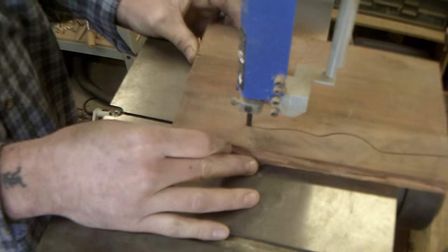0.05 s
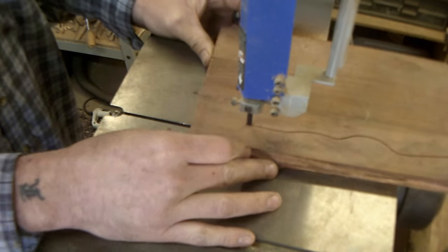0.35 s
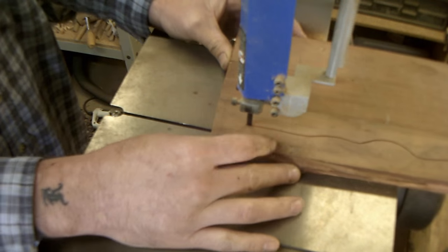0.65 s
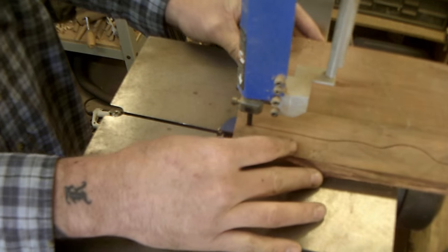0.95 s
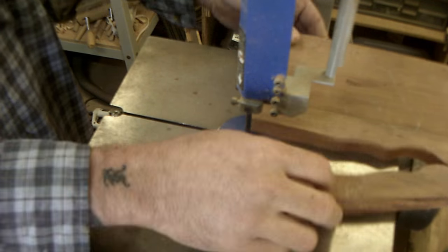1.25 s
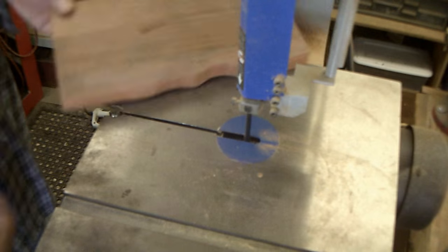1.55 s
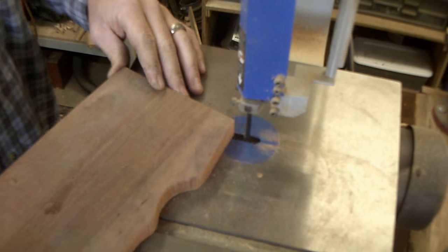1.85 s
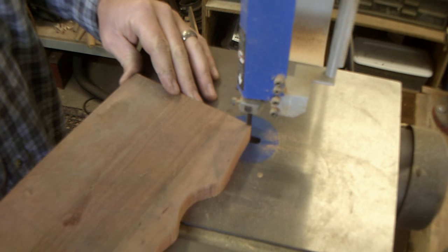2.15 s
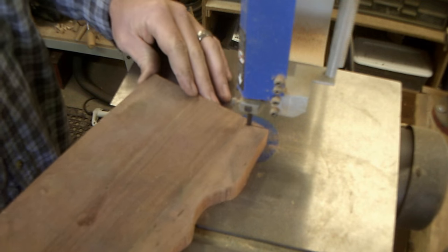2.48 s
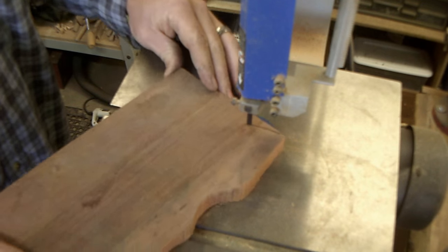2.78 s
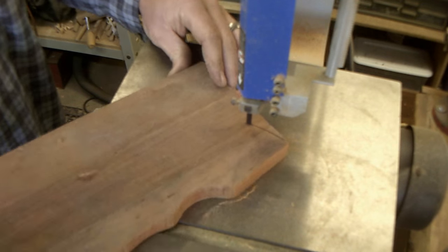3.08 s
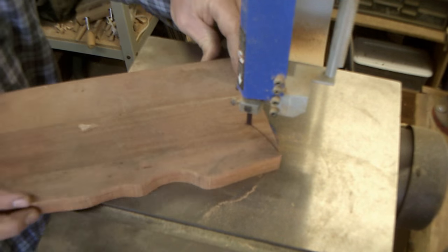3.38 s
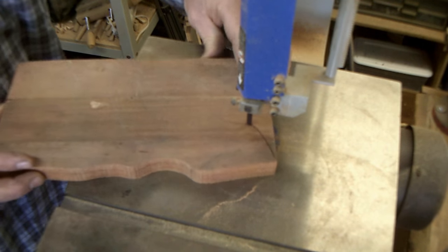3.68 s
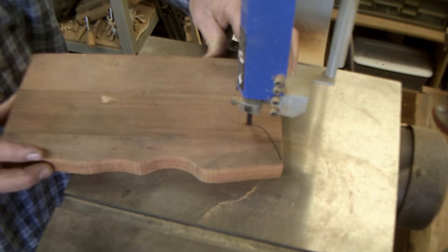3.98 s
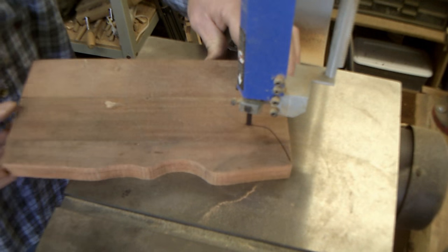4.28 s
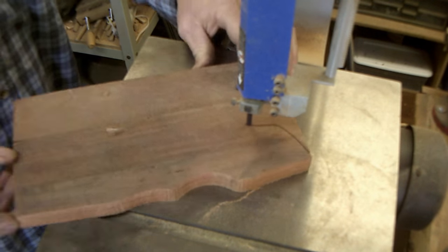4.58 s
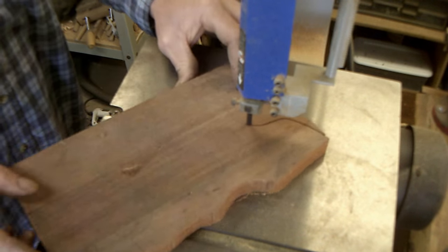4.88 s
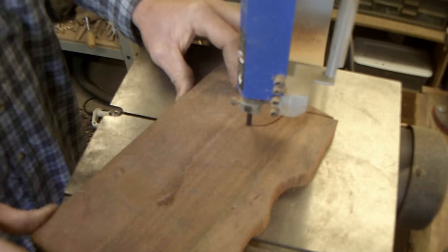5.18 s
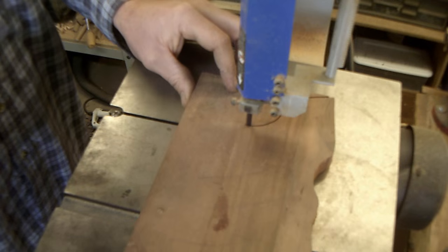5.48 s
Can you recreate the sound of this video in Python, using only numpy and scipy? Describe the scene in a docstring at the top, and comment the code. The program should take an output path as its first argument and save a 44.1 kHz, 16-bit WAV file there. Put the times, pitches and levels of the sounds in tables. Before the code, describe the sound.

A band saw drones and thumps close by, rasping and ringing through two cuts in hardwood, with thin squeaks in the second.

```python
"""A benchtop band saw cuts hardwood close by; its frame drones, its wheels thump and its blade hums.
At first the teeth rasp through the board, which judders on the table while the pinched blade rings.
At 1.2 s the last fibres snap, the band twangs, the stand rocks and the saw runs free. A second cut
bites in at 2.1 s; the hand eases and nudges the board, and the blade squeaks in the kerf. From 4.3 s
the machine labours round a tight curve, where the twisted blade finally grinds on the kerf walls."""
import sys
import numpy as np
from scipy import signal
from scipy.fft import rfft, irfft, next_fast_len
from scipy.io import wavfile
from scipy.ndimage import uniform_filter1d

SR = 44100
rng = np.random.default_rng(int(sys.argv[2]) if len(sys.argv) > 2 else 0)


def unload_audio(sound):
    """Save the sound as a 16-bit wav file, at the path given as the first command line argument."""
    columns = np.transpose(np.atleast_2d(sound))
    # keep every value between -1 and 1, then stretch to whole-number steps
    steps = np.round(np.clip(columns, -1, 1) * 32767)
    wavfile.write(sys.argv[1], SR, steps.astype(np.int16))


N = 244314
TIME, FREQS = np.arange(N) / SR, np.fft.rfftfreq(N, 1 / SR)

# the two cuts: (start [s], end [s], note of the pinched blade [Hz])
CUTS = [(-.3, 1.239, 1186), (2.07, 5.8, 1168)]
# the feed, one table a cut: (time [s], tooth rasp [dB], blade ring [dB], dust hiss [dB])
FEED_LEVELS = [
    [(0, -32, -35, -39), (.2, -28, -21.5, -38), (.34, -33.5, -30, -41), (.45, -30.5, -25, -39),
     (.56, -33, -26.5, -42), (.64, -29, -24.5, -38), (.81, -30.5, -22.5, -42.5), (.97, -28, -14, -40),
     (1.07, -25, -16, -41.5), (1.24, -27, -19, -39.5)],
    [(2.1, -31, -31, -39.5), (2.35, -29, -25, -35.5), (2.46, -28, -19, -38), (2.64, -30.5, -20.5, -37.5),
     (2.94, -26.5, -16.5, -39.5), (3.0, -35, -28, -41.5), (3.5, -37, -39, -38.5),
     (3.85, -34.5, -28.5, -38.5), (4.15, -36.5, -36, -39), (4.7, -35.5, -35, -40.5), (5.3, -33, -33, -40.5),
     (5.54, -38.5, -35, -46.5)],
]
# the hand lets off: (centre [s], duration [s], level change [dB])
EASES = [(3.063, 0.16, -4.5), (3.619, 0.14, -6.5), (4.382, 0.1, -8)]
# the hand pushes on: (centre [s], duration [s], added rasp [dB], added ring [dB])
NUDGES = [(2.898, .07, 2, 0), (3.128, 0.086, 8.5, 11.5), (3.228, .04, 7, 1), (3.34, 0.082, 5, 2.5),
          (3.73, 0.061, 1, 5.5), (3.936, 0.086, 4, 4), (4.304, 0.089, 5, 8), (4.485, 0.071, 3.5, 4),
          (4.892, 0.056, 4.5, 4.5)]
# rubbing notes: (centre [s], duration [s], frequency [Hz], level [dB])
GROANS = [(.15, 0.43, 321, -23), (.655, .19, 96, -20.5), (.88, 0.169, 283, -22.5), (2.21, 0.1, 306, -23)]  # the board judders on the table
SQUEAKS = [(2.56, .07, 7660, -40), (2.68, .16, 7140, -54), (3.46, 0.061, 7470, -35.5),
           (3.74, 0.078, 7286, -42), (4.26, 0.21, 6800, -43), (4.63, 0.16, 6830, -45),
           (4.92, 0.2, 6500, -45.5)]  # the blade's side rubs in the kerf
# short, dry treble clicks: (time [s], peak level [dB])
CLICKS = [(1.0644, -23), (3.1363, -34)]
# the wheels' hardest thumps: (time [s], peak level [dB])
HARD_KNOCKS = [(0.236, -7), (.295, -5.5), (0.686, -6), (1.923, -3.5), (2.248, -13), (2.57, -7),
               (3.851, -10), (4.055, -6), (4.388, -4.5), (4.91, -5)]
# rotation of the wheels: (time [s], speed [turns/s])
WHEEL_SPEED = [(0, 6.49), (1.9, 6.49), (1.95, 6.24), (5.54, 6.24)]
# resonances: (frequency [Hz], width [Hz], relative level [dB])
BOARD_MODES = [(1304, 100, -2), (1385, 100, 5), (1566, 27, 0), (1820, 100, 2), (1894, 59, -0.5),
               (2015, 70, 2), (2104, 69, -2), (2195, 39, -8.5), (2200, 50, 2), (2406, 78, 3),
               (2550, 51, -1), (2670, 22, 2), (2707, 33, 0.5), (2900, 72, -4), (3080, 140, -5.5),
               (3313, 69, -9), (3755, 38, -17.5), (3870, 31, -17.5)]
BLADE_MODES = [(1193, 14, 3.5), (1143, 33, 0), (1067, 40, -6.5), (1243, 84, -4.5)]
BOARD_EDGE_MODES = [(1310, 63, 5.5), (1575, 70, 0.5), (2440, 99, 2), (2600, 130, -4.5), (4360, 83, -18.5),
                    (5400, 230, -23.5)]
GRIND_MODES = [(2212, 86, 3.5), (3090, 130, -3), (3900, 220, -24)]  # twisted blade on the kerf walls
TWANG_MODES = [(923, 27, 0), (1564, 55, -9.5)]  # band springing free
STAND_MODES = [(74.1, 12, 4), (79, 39.4, -6.5), (24, 9.8, -6.5), (118, 50, -11.5)]
HOUSING_MODES = [(219.8, 26.6, 1.5), (270, 23, -3), (310, 38.5, -1.5), (425, 32, -7), (543, 213, -12)]
TABLE_MODES = [(630.3, 39.4, -1), (706.4, 73, -5.5), (785, 45, -20.5), (906, 7.3, -22.5), (1121, 21, -12.5),
               (1470, 27, -29), (1950, 51, -16), (2038, 80, -21), (2823, 240, -29)]
LABOUR_MODES = [(136, 25, 2), (407, 7.4, 1)]  # machine droning in the curve
# broadband spectra: (frequency [Hz], relative spectral density [dB])
RASP_SPECTRUM = [(700, -25.5), (1200, -6.5), (2000, 5), (3100, -6.5), (3480, -24), (4500, -40), (8000, -57)]  # teeth in the wood
SCRAPE_SPECTRUM = [(2500, -9.5), (3400, 6), (4100, 6.5), (4550, 4.5), (4950, -3), (5400, 1.5), (6200, 9),
                   (8000, -10.5)]  # scraping in the kerf
DUST_SPECTRUM = [(4500, -39.5), (5700, -28.5), (6100, -10), (6800, -1.5), (7500, 3.5), (7800, -2),
                 (8100, -9.5)]  # hiss of sawdust
RUNNING_SPECTRUM = [(15, -6), (70, -6), (160, 0), (370, -9.5), (560, -3.5), (950, -16.5), (1750, -20),
                    (2400, -27), (3200, -32), (3600, -48.5), (4600, -43), (5050, -55), (6200, -45),
                    (7650, -40), (8000, -53)]  # motor, belt and bearings

TOOTH_RATE_HZ = 645
SING_DB, FULL_SING_RING_DB = -3, -18  # the note's greatest level re the ring; ring level that gives it
SING_WIDTH_HZ, WHINE_MODE = 16, (3692, 85, -32)  # thin overtone: (frequency [Hz], width [Hz], level [dB])
FIRST_KNOCK_S, KNOCK_GAP_S = .076, .061


def cutting(feeds):
    """Forced vibration: tooth impacts drive the modes of board and blade; a pinched blade sings."""
    grain = amp(0.92 * wander(rate_hz=110))  # hard and soft streaks in the wood
    chips = teeth(spread_db=2.0, decay_periods=1.0)
    rasp = amp(-1.5) * resonate(chips, BOARD_MODES) + amp(-7.5) * coloured(chips, RASP_SPECTRUM)
    blade = amp(-1) * resonate(teeth(spread_db=0.4, decay_periods=1.0), BLADE_MODES)
    scrape = coloured(chips, SCRAPE_SPECTRUM)
    dust = amp(1.5) * coloured(teeth(spread_db=1.5, decay_periods=1.2), DUST_SPECTRUM)
    out = np.zeros(N)
    for (_, _, sing_hz), (engaged, rasp_db, ring_db, dust_db) in zip(CUTS, feeds):
        sing_gain = amp(SING_DB) * np.minimum(amp(ring_db - FULL_SING_RING_DB), 1)
        sing = sing_gain * modal_noise([(sing_hz, SING_WIDTH_HZ, 0), WHINE_MODE])
        scrape_db = -39.5 + 0.26 * rasp_db  # follows the rasp only weakly
        out += engaged * (amp(rasp_db) * rasp + amp(ring_db) * (blade + sing)
                          + amp(scrape_db) * scrape + amp(dust_db) * dust)
    return grain * (out + kerf_grind() + edge_buzz(engaged=feeds[1][0]))


def teeth(spread_db, decay_periods):
    """Amplitude modulation: each tooth tears a chip of its own size, a decaying noise burst; rms 1."""
    passed = np.cumsum(TOOTH_RATE_HZ * (1 + .015 * wander(rate_hz=12))) / SR
    chip_size = amp(spread_db * np.clip(rng.standard_normal(N), -2, 2))[passed.astype(int)]
    return unit(rng.standard_normal(N) * chip_size * np.exp(-(passed % 1) / decay_periods))


def feeding():
    """Feed force sets the excitation. For each cut: engagement (0-1), then rasp, ring and dust [dB]."""
    eased = amp(sum(db * swell(s, length) for s, length, db in EASES))
    more_rasp, more_ring = sum(np.outer(dbs, swell(s, length)) for s, length, *dbs in NUDGES)
    feeds = []
    for (start, end, _), levels in zip(CUTS, FEED_LEVELS):
        rasp_db, ring_db, dust_db = curves(levels)
        engaged = contact(start, end) * eased
        feeds.append((engaged, rasp_db + more_rasp, ring_db + more_ring, dust_db + 0.22 * more_rasp))
    return feeds


def contact(start, end, bite_db=-13, bite_s=.075, edge_s=.005):
    """Coupling of teeth to wood, 0-1: they sink in gradually and come clear at once."""
    touching = np.clip((TIME - start) / edge_s, 0, 1)
    sinking = amp(bite_db * np.exp(-since(start) / bite_s))
    return touching * sinking * np.exp(-since(end) / edge_s)


def edge_buzz(engaged, length_s=0.89, fade_db_per_s=-6):
    """Resonance of the board's edge, driven by the teeth as they enter the second cut."""
    age = since(CUTS[1][0])
    ending = np.clip((length_s - age) / 0.044, 0, 1)
    return engaged * amp(-24 + fade_db_per_s * age) * ending * modal_noise(BOARD_EDGE_MODES)


def kerf_grind():
    """Sliding friction: twisted in the curve, the blade grinds on the kerf walls."""
    return amp(-32) * swell(centre_s=5.3, length_s=0.35) * modal_noise(GRIND_MODES)


def break_out(snap_s=.005):
    """Release of elastic energy: the last fibres of the first cut snap and the freed band twangs."""
    fracture = np.exp(-((TIME - CUTS[0][1] + snap_s) / snap_s) ** 2)
    snap = fracture * modal_noise([(2700, 700, 0)])
    return amp(-30.5) * snap + amp(-32) * band_swing() * modal_noise(TWANG_MODES)


def band_swing(rise_s=0.046, length_s=0.37):
    """Free vibration: the envelope, 0-1, of the band after it springs out of the first cut."""
    age = since(CUTS[0][1])
    return np.minimum(age / rise_s, 1) * np.exp(-(age / length_s) ** 4)


def rubs(rows, width_hz):
    """Friction excites one resonance for a moment: narrow-band noise that swells and dies."""
    out = np.zeros(N)
    for s, length, hz, db in rows:
        span = np.flatnonzero(abs(TIME - s) < length)
        size = next_fast_len(len(span))
        detuning_hz = np.fft.rfftfreq(size, 1 / SR) - hz
        note = irfft(rfft(rng.standard_normal(size)) / (1 + 2 * (detuning_hz / width_hz) ** 2), size)
        out[span] += amp(db) * unit(note[:len(span)]) * swell(s, length)[span]
    return out


def clicks(decay_s=0.0018):
    """Transients: rapidly decaying bursts of noise are heard as short, dry treble clicks."""
    t = np.arange(SR // 50) / SR
    burst = rng.standard_normal(len(t)) * np.exp(-t / decay_s)
    treble = signal.butter(2, [2600, 6500], "band", fs=SR, output="sos")
    return pulse_train(CLICKS, signal.sosfilt(treble, burst))


def blade_hum(feeds, free_hz=653, sag_hz=17, full_load_rasp_db=-27):
    """Loading and damping: the running band's tone drops in pitch and level as it cuts."""
    load = sum(engaged * amp(rasp_db - full_load_rasp_db) for engaged, rasp_db, _, _ in feeds)
    load = uniform_filter1d(np.minimum(load, 1), size=SR // 8)  # the wheels' inertia
    cycles = np.cumsum(free_hz - sag_hz * load + 1.94 * wander(rate_hz=25)) / SR
    waver_db = 1.3 * wander(rate_hz=60)
    damping_db = 5 * np.sqrt(abs(load))
    level_db = -23.5 - damping_db + 7.5 * band_swing() + waver_db
    return amp(level_db) * np.sqrt(2) * np.sin(2 * np.pi * cycles)


def wheel_knocks(push_hz=58, push_s=.006):
    """Periodic impacts: the uneven wheel knocks twice a turn, at times hard; the stand damps each push."""
    turns = wheel_turns(FIRST_KNOCK_S)
    turn_times = np.interp(np.arange(int(turns[-1])), turns, TIME)
    times = (turn_times[:, None] + [0, KNOCK_GAP_S]).ravel()
    jitter, strength = rng.standard_normal((len(times), 2)).T
    light = np.transpose([times + .002 * jitter, -11 + 1.3 * strength])  # (time [s], level [dB])
    # a hard knock replaces any light one within 25 ms
    apart = abs(times[:, None] - np.transpose(HARD_KNOCKS)[0]).min(axis=1) > .025
    knocks = np.vstack([light[apart], HARD_KNOCKS])
    t = np.arange(-SR // 50, SR // 50) / SR
    push = np.cos(2 * np.pi * push_hz * t) * np.exp(-(t / push_s) ** 2)
    return pulse_train(knocks + [t[0], 0], push)  # each push is centred on its time


def wheel_turns(start):
    """Rotation is the integral of speed: turns of the wheels since the given time."""
    turns = np.cumsum(curves(WHEEL_SPEED)[0]) / SR
    return turns - np.interp(start, TIME, turns)


def machine_frame(labour_from_s=4.3, throb_depth=0.31):
    """Structure-borne sound: motor, belt and bearings shake the stand, sheet housing and metal table."""
    labour = np.clip((TIME - labour_from_s) / .25, 0, 1)
    jolt = np.exp(-((TIME - CUTS[0][1] - 0.066) / 0.069) ** 2)  # the stand rocks as the load drops
    stand_db = -21.5 + 4 * labour + 9.5 * jolt
    stand = modal_noise(STAND_MODES)
    stand = unit(stand / np.sqrt(abs(signal.hilbert(stand)) ** 2 + 0.44))  # rubber feet limit the swing
    heave = np.cos(2 * np.pi * wheel_turns(FIRST_KNOCK_S + KNOCK_GAP_S / 2))
    throb = 1 + throb_depth * (1 - labour) * heave
    housing = resonate(rattle(depth_db=0.5, rate_hz=420), HOUSING_MODES)
    table = resonate(rattle(depth_db=1.0, rate_hz=84), TABLE_MODES)
    running = coloured(rattle(depth_db=0.5, rate_hz=57), RUNNING_SPECTRUM)
    drone = labour * modal_noise(LABOUR_MODES)
    return (amp(stand_db) * throb * stand + amp(-23) * housing + amp(-22) * table
            + amp(-24) * running + amp(-29.5) * drone)


def rattle(depth_db, rate_hz):
    """Random amplitude modulation gathers noise into irregular clumps; rms 1."""
    return unit(rng.standard_normal(N) * amp(depth_db * wander(rate_hz)))


def pulse_train(rows, pulse):
    """Convolution repeats one pulse at each row's time and peak level, with random polarity."""
    impulses = np.zeros(N)
    for (s, db), sign in zip(rows, rng.choice([-1, 1], len(rows))):
        impulses[int(np.clip(s * SR, 0, N - 1))] += sign * amp(db)
    return signal.oaconvolve(impulses, pulse / abs(pulse).max())[:N]


def resonate(x, modes):
    """Modal filtering: x passes through steep-sided resonances whose powers add; rms 1."""
    power = sum(amp(db) ** 2 / (1 + 2 * ((FREQS - hz) / width) ** 2) ** 2 for hz, width, db in modes)
    return unit(irfft(rfft(x) * np.sqrt(power), N))


def modal_noise(modes):
    """Random excitation of resonances by white noise; rms 1."""
    return resonate(rng.standard_normal(N), modes)


def coloured(x, spectrum):
    """Spectral shaping of x by a broad curve in log frequency; rms 1."""
    hz, db = np.transpose(spectrum)
    gain = amp(np.interp(np.log(FREQS + 1), np.log(hz), db))
    return unit(irfft(rfft(x) * gain, N))


def wander(rate_hz):
    """Low-pass noise: a smooth random fluctuation; rms 1."""
    return unit(irfft(rfft(rng.standard_normal(N)) * np.exp(-(FREQS / rate_hz) ** 2), N))


def swell(centre_s, length_s):
    """A flat-topped Gaussian envelope, 0-1."""
    return np.exp(-np.minimum((2 * (TIME - centre_s) / length_s) ** 2, 5) ** 2)


def curves(rows):
    """Linear interpolation in time of each column after the first."""
    times, *columns = np.transpose(rows)
    return [np.interp(TIME, times, column) for column in columns]


def since(start):
    """Elapsed time [s], zero before the start."""
    return np.maximum(TIME - start, 0)


def amp(db):
    """Amplitude ratio of a level in decibels."""
    return 10 ** (np.asarray(db) / 20)


def unit(x):
    """Normalisation to rms 1."""
    return x / np.sqrt(np.mean(x ** 2) + 1e-20)


def scene():
    """Superposition of the running saw, its two cuts and the treble clicks, in one channel."""
    feeds = feeding()
    saw = machine_frame() + wheel_knocks() + blade_hum(feeds)
    wood = cutting(feeds) + break_out() + rubs(GROANS, width_hz=16) + rubs(SQUEAKS, width_hz=310)
    return ((saw + wood + clicks()) * signal.windows.tukey(N, .001))[None]


def record(dry, ceiling=.95, cutoff_hz=7940):
    """Saturation and band limiting: a small microphone rounds the highest peaks and loses the top treble."""
    rounded = dry / (1 + (dry / ceiling) ** 12) ** (1 / 12)
    low_pass = signal.firwin(301, cutoff_hz, window=("kaiser", 8), fs=SR)
    return signal.oaconvolve(rounded, low_pass[None], "same")


dry = scene()
out = record(dry)
unload_audio(out)
```